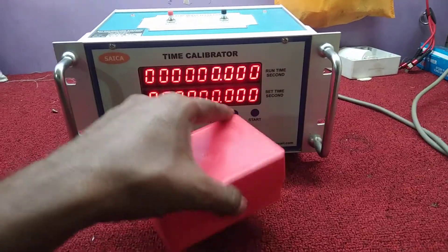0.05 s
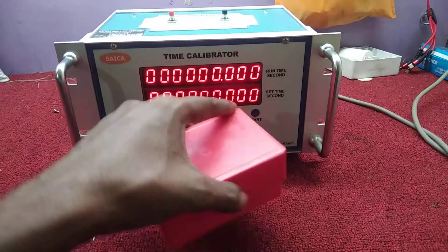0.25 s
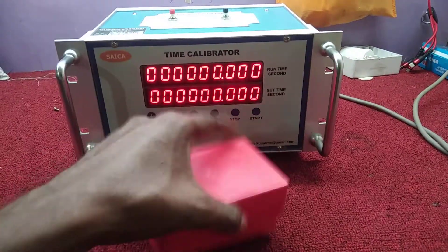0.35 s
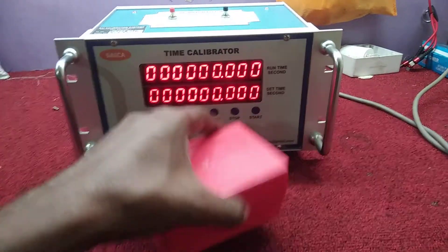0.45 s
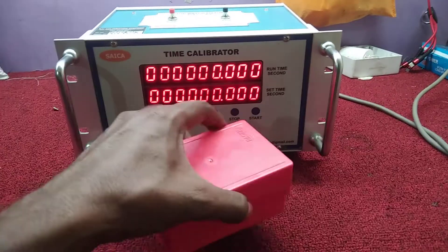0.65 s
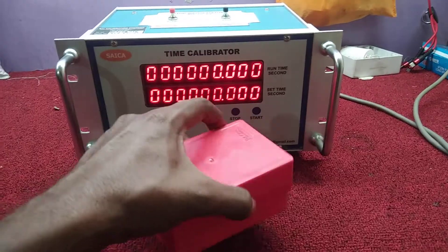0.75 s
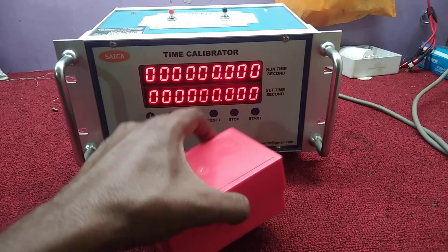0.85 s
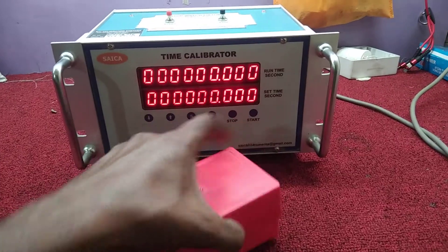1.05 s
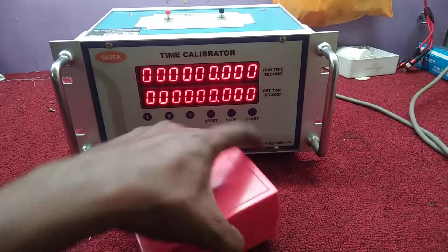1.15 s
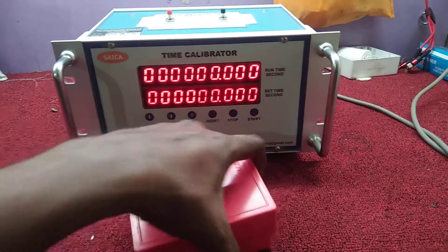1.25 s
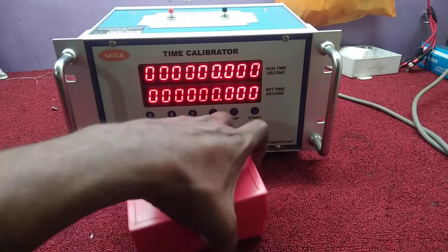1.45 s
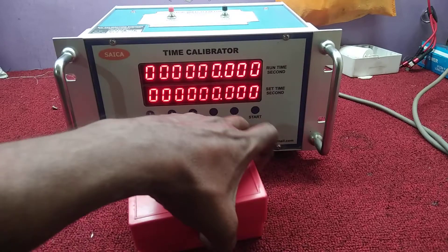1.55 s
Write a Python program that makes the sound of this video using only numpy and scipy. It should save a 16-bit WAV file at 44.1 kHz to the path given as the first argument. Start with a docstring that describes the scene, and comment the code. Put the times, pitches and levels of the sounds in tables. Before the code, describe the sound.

A hollow plastic box is handled close by, ticking lightly around 0.2 seconds, then clacking hard at about 0.4 and 0.6 seconds with a short room tail. It bumps softly on carpet near 0.85 and 1.1 seconds, and a soft low boom follows some knocks. Fingers rub with a faint grainy hiss, and small ticks come from 1.4 to 1.6 seconds, over faint steady room tone.

```python
"""A small quiet room, close to a phone: a hand turns a hollow plastic box over on the carpet.
Fingers rub along its walls in a grainy hiss. The loose shell ticks and twice clacks hard, each
contact ringing the box's modes under a short crack, and it bumps softly on the pile. A soft low boom
of the room or floor follows some knocks. A short room tail answers, over a faint steady room tone."""
import sys
import numpy as np
from scipy import signal
from scipy.fft import rfft, irfft
from scipy.io import wavfile

SR = 44100
rng = np.random.default_rng(int(sys.argv[2]) if len(sys.argv) > 2 else 0)


def wav_record(signal):
    """Record a signal, one row per channel, as 16-bit PCM in the file named by sys.argv[1]."""
    frames = np.transpose(np.atleast_2d(signal))
    bounded = np.clip(frames, -1, 1)
    # unit amplitude maps onto the largest positive 16-bit level
    quanta = np.round(bounded * 32767).astype(np.int16)
    wavfile.write(sys.argv[1], SR, quanta)


N = 70560


def undb(db):
    """Decibels to gain."""
    return 10 ** (np.asarray(db) / 20)


def pan(db):
    """Stereo gains that set the left this many dB above the right."""
    return undb(np.array([[db], [-db]]) / 2)


def at(points, hz):
    """Read a curve on a log-frequency axis."""
    f, values = np.array(points).T
    return np.interp(np.log(np.maximum(hz, 1)), np.log(f), values)


def colour(x, points):
    """Minimum-phase EQ through (f/Hz, level/dB) points, keeping the power of white noise."""
    gain = undb(at(points, np.fft.rfftfreq(2 * N, 1 / SR)))
    gain /= np.sqrt(np.mean(gain ** 2))
    cepstrum = irfft(np.log(gain))
    cepstrum[1:N] *= 2  # folded forward, so nothing rings ahead of an attack
    cepstrum[N + 1:] = 0
    return irfft(rfft(x, 2 * N) * np.exp(rfft(cepstrum)))[..., :N]


def noise(likeness):
    """Stereo white noise, from wide (likeness 0) to mono (1)."""
    white = rng.standard_normal((3, N))
    return np.sqrt(likeness) * white[0] + np.sqrt(1 - likeness) * white[1:]


def since(start):
    """Seconds since a moment, zero before it."""
    return np.maximum(np.arange(N) / SR - start, 0)


def fade(t, t60, attack_s=0.0004):
    """A quick push, then an exponential decay of 60 dB in t60 seconds."""
    return (1 - np.exp(-t / attack_s)) * np.exp(-np.log(1000) * t / t60)


def ring(t, hz, t60, phase=0):
    """One damped mode."""
    return np.sin(2 * np.pi * hz * t + phase) * fade(t, t60)


def burst(t, t60, spectrum):
    """A decaying puff of coloured noise."""
    return colour(noise(likeness=0.33) * fade(t, t60), spectrum)


def rubbing(slips_per_s=680):
    """Skin and carpet on the walls: tiny slips over a smooth hiss, as strong as the hand's movement."""
    # swell of the rubbing: t/s, level/dB
    swell = [(0, -64.5), (.04, -68.5), (.33, -68.5), (.40, -58.5), (.52, -55.5), (.58, -56), (.76, -63.5),
             (0.941, -67.5), (1.05, -74), (1.109, -58.5), (1.195, -65), (1.215, -59), (1.269, -57.5),
             (1.31, -61), (1.365, -50.5), (1.388, -58.5), (1.458, -52.5), (1.508, -54.5), (1.55, -65),
             (1.578, -54), (1.6, -63)]
    # friction spectrum: f/Hz, level/dB
    spectrum = [(150, -73.5), (450, -0.5), (800, 6.5), (1200, -2.5), (2200, -3), (3000, 0), (4400, -0.5),
                (5400, -8.5), (7000, 1), (10000, -4.5), (14000, -7.5)]
    onsets = rng.random(N) < slips_per_s / SR
    scatter_db = -0.5 * np.minimum(rng.exponential(size=N), 3)
    slips = onsets * undb(scatter_db) * noise(likeness=0.17)
    hiss = 0.5 * slips / slips.std() + 0.94 * noise(likeness=0.1)
    level_db = np.interp(since(0), *np.array(swell).T)
    return colour(hiss, spectrum) * undb(level_db)


def room_tone():
    """The faint, steady low rush of the quiet room."""
    # background spectrum: f/Hz, level/dB
    spectrum = [(25, -49), (45, -32.5), (65, 2.5), (95, -14.5), (130, 3), (175, -13), (270, -0.5),
                (450, -6), (800, -10.5), (1300, -15), (3000, -17), (5400, -27), (7000, -23.5), (14000, -48)]
    return undb(-63) * colour(noise(likeness=0.61), spectrum)


def shell(t, crack_db, stretch, place, bass_cut_hz=293):
    """The struck box: ringing modes, and a short crack from the dense upper ones."""
    # modes of the box: f/Hz, level/dB, t60/s
    modes = [(258, -16, 0.078), (307.5, -26, 0.22), (437.4, -9.5, .07), (536, -5, 0.044), (647, -8, 0.052),
             (714, -4.5, .075), (773.3, 0.5, 0.044), (945.6, -14.5, 0.12), (1222, -23, 0.042),
             (1588, -12.5, 0.076), (1678, -5.5, 0.04), (2539, -14, 0.052), (3020, -16, 0.073),
             (3815, -23, 0.016), (4440, -19, 0.11)]
    # spectrum of the crack: f/Hz, level/dB
    crack_spectrum = [(150, -15.5), (400, 9.5), (900, -0.5), (1300, -1.5), (2100, -6), (2900, 0.5),
                      (4500, -3), (5400, -14), (7400, -5), (10500, -7), (13000, -12), (15000, -18.5)]
    body = 0
    for k, (hz, db, t60) in enumerate(modes):
        detune, spread = rng.standard_normal(2)
        phase = 0.28 * spread * np.array([[1], [-1]])  # reaches the two ports a little out of step
        weight = undb(db + 3.5 * place * (-1) ** k)  # the strike place favours every second mode
        body = body + weight * ring(t, hz * (1 + 0.003 * detune), t60 * stretch, phase)
    # small walls radiate little bass
    body = signal.lfilter(*signal.butter(2, bass_cut_hz, "high", fs=SR), body)
    crack = burst(t, t60=0.038 * stretch, spectrum=crack_spectrum)
    return body + undb(crack_db - 1.5) * crack


def ticks():
    """Light shell contacts: each favours the pitch of its own stiffness and passes little above it."""
    # ticks: t/s, level/dB, contact f/Hz, crack/dB, decay stretch, strike place (-1 to 1)
    contacts = [(0.1433, -50.5, 1020, 7.5, 1.45, 0.36), (0.178, -33, 920, 5.5, 0.76, 0.69),
                (0.1887, -30, 1500, 4.5, 0.55, -0.17), (0.2087, -28.5, 9720, 0.5, 0.67, 0.83),
                (0.359, -54.5, 940, 3, 1.35, 0.7), (0.398, -58.5, 860, 0, 3.1, 0.68),
                (0.4486, -24, 1770, 5.5, 0.82, .3), (0.546, -48, 3440, 5.5, 1.0, .3),
                (0.591, -36, 1510, 5.5, 1.54, 0.11), (1.403, -43, 2630, -1, 1.23, 0.052),
                (1.487, -53.5, 740, -11, 0.82, 0.91), (1.5675, -55, 830, -4, .7, .2),
                (1.577, -55, 653, 5.5, 0.97, 0.68)]
    for start, db, hz, crack_db, stretch, place in contacts:
        hit = shell(since(start), crack_db, stretch, place)
        soft = signal.lfilter(*signal.butter(1, hz, fs=SR), hit)
        peak = signal.lfilter(*signal.iirpeak(hz, Q=1.08, fs=SR), hit)
        yield undb(db) * (soft + undb(1) * peak), -12.5  # sound, room send/dB


def booms(rise_s=0.004):
    """A soft, low boom of the room or floor swells just after some of the knocks."""
    # low booms: t/s, level/dB, f/Hz
    low_booms = [(0.21, -44, 116.4), (0.443, -45, 130.2), (0.515, -47.5, 139.1), (1.114, -51, 126.8)]
    low = 0
    for start, db, hz in low_booms:
        t = since(start)
        low = low + undb(db) * ring(t, hz, t60=0.21) * (1 - np.exp(-t / rise_s))
    return low


def clacks():
    """Hard shell contacts, with a bright snap on top and a low thump beneath."""
    # clacks: t/s, level/dB, crack/dB, snap/dB, decay stretch, strike place (-1 to 1),
    # thump/dB, room send/dB, left minus right/dB
    contacts = [(0.4363, -14, 0, -6, 0.97, 0.91, -34, -14.5, 3.5),
                (0.5998, -13.5, 3.5, 2, 0.59, -0.83, -14.5, -9.5, -1)]
    # spectrum of the snap: f/Hz, level/dB
    snap_spectrum = [(200, -5), (1000, -10), (2200, -21), (3000, -3.5), (4400, 5), (5400, -8), (7400, 3),
                     (10500, -6.5), (13000, 6), (15000, -10.5)]
    for start, db, crack_db, snap_db, stretch, place, thump_db, send_db, pan_db in contacts:
        t = since(start)
        snap = undb(snap_db) * burst(t, t60=0.023, spectrum=snap_spectrum)
        thump = undb(thump_db) * ring(t, hz=85, t60=0.01)
        hit = shell(t, crack_db, stretch, place) + snap + thump
        yield undb(db) * pan(pan_db) * hit, send_db


def bumps():
    """The carpet damps the box to a dull knock and a scuff."""
    # landings on the pile: t/s, level/dB, f/Hz
    landings = [(0.849, -36.5, 395), (1.1, -36, 336), (1.1209, -36.5, 389), (1.242, -46.5, 303)]
    # spectrum of the scuff: f/Hz, level/dB
    scuff_spectrum = [(80, -27.5), (300, -3), (650, -7.5), (1200, -18), (4000, -25), (14000, -47.5)]
    for start, db, hz in landings:
        t = since(start)
        knock = ring(t, hz, t60=0.016)
        scuff = undb(-9) * burst(t, t60=0.032, spectrum=scuff_spectrum)
        yield undb(db) * pan(4) * (knock + scuff), -16  # sound, room send/dB


def room(send, predelay_s=0.0026, build_s=0.0045):
    """Diffuse reflections, different at each port, that die in about a quarter of a second."""
    # colour of the reflections: f/Hz, level/dB
    spectrum = [(60, 6), (130, 6.5), (190, -3), (300, 11.5), (400, -0.5), (650, 5), (1100, 2), (1650, -3),
                (2400, 5.5), (5000, -4), (8500, 4.5), (13000, -8.5)]
    # decay by band: f/Hz, t60/s
    decays = [(120, 0.22), (500, 0.22), (2000, 0.29), (8000, 0.22), (14000, 0.26)]
    t, hz = since(predelay_s), np.fft.rfftfreq(N, 1 / SR)
    white, tail = rfft(noise(likeness=0.4)), 0
    for k, (_, t60) in enumerate(decays):
        band = at([(f, j == k) for j, (f, _) in enumerate(decays)], hz)  # crossfades to its neighbours
        tail = tail + irfft(white * band, N) * fade(t, t60)
    tail *= 1 - np.exp(-t / build_s)
    tail /= np.sqrt(np.sum(tail ** 2) / 2)
    return signal.fftconvolve(send, colour(tail, spectrum), axes=1)[:, :N]


def ports(x, near, left_lag_s=0.00006):
    """Two unlike microphone ports, the left a little farther away, the right shaded from near sounds."""
    # colour between the ports: f/Hz, left minus right/dB
    balance = [(130, 13), (270, 11), (420, 4), (540, -3), (780, -3), (1100, 0), (1700, -1), (4200, 1),
               (7500, 0), (10000, 4), (12500, 8)]
    # treble shadow of the phone's body: f/Hz, level/dB
    shade = [(7500, 0), (10000, -6), (12000, -11)]
    hz = np.fft.rfftfreq(2 * N, 1 / SR)
    ratio = undb(at(balance, hz))
    left = ratio * np.exp(-2j * np.pi * hz * left_lag_s)
    right = undb(near * at(shade, hz))
    response = np.array([left, right]) * np.sqrt(2 / (1 + ratio ** 2))
    return irfft(rfft(x, 2 * N) * response)[:, :N]


def scene():
    """The handled box up close, with the room's answer and tone behind it."""
    hits = [*clacks(), *ticks(), *bumps()]
    reflections = room(sum(hit * undb(send_db) for hit, send_db in hits))
    ambience = reflections + room_tone()
    direct = sum(hit for hit, _ in hits) + booms() + rubbing()
    return ports(direct, near=True) + ports(ambience, near=False)


def record(dry):
    """The phone cuts the top steeply above 14.3 kHz."""
    return signal.sosfilt(signal.ellip(8, 0.2, 70, 14300, fs=SR, output="sos"), dry)


dry = scene()
out = record(dry)
wav_record(out)
```